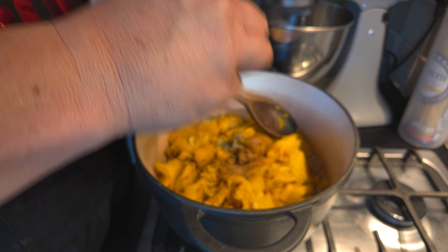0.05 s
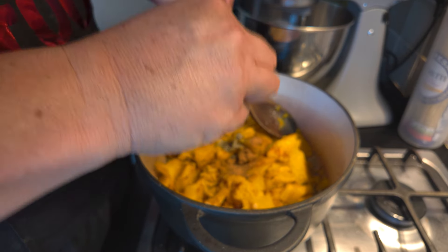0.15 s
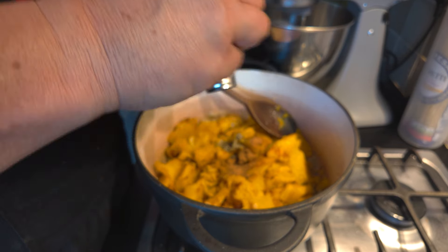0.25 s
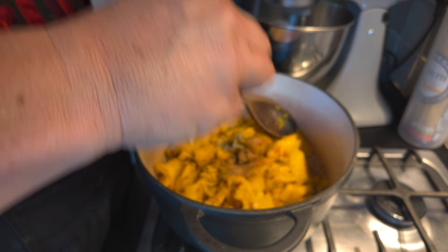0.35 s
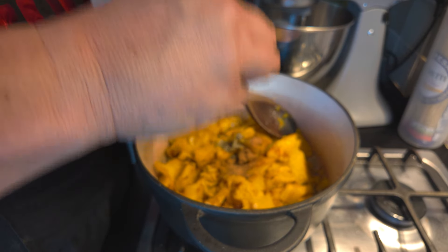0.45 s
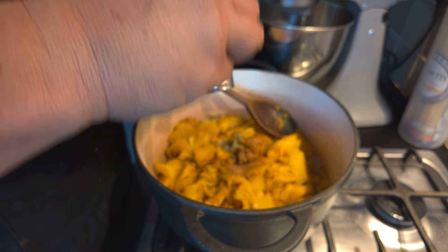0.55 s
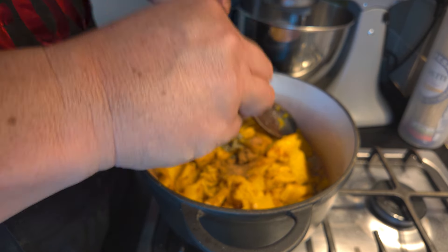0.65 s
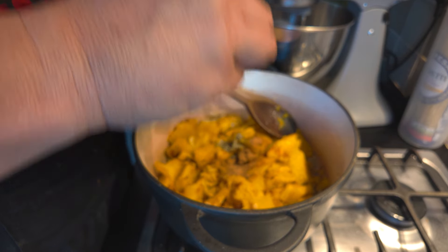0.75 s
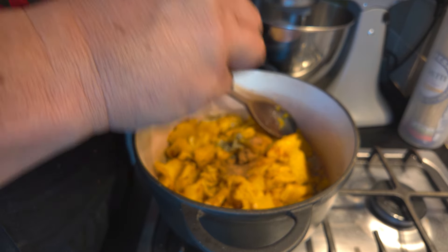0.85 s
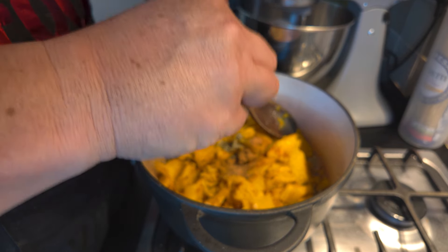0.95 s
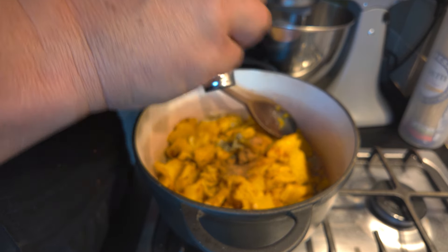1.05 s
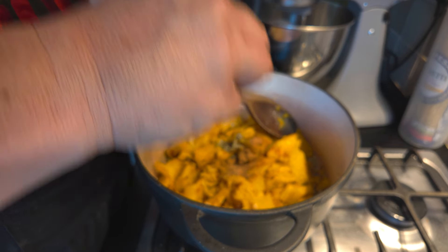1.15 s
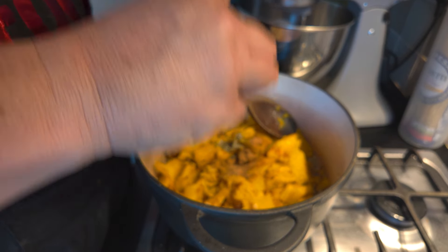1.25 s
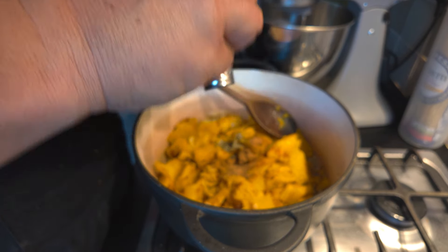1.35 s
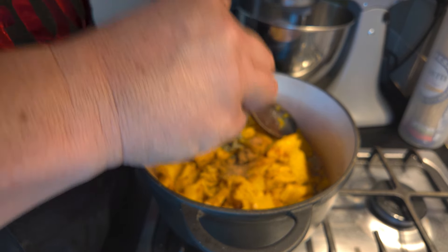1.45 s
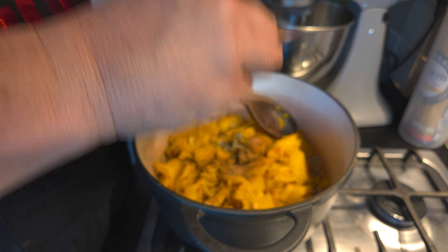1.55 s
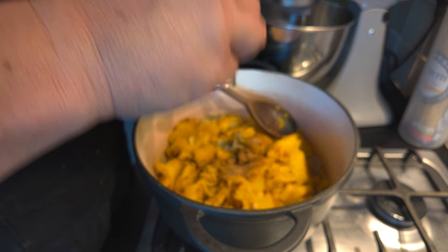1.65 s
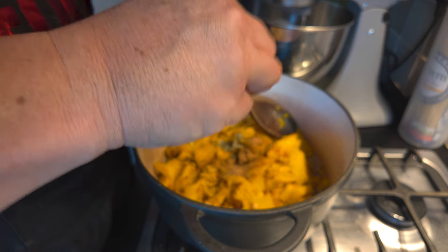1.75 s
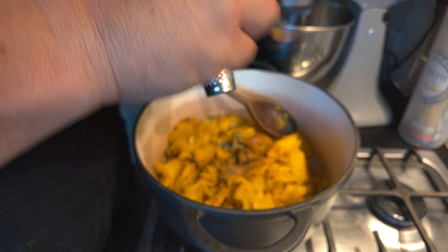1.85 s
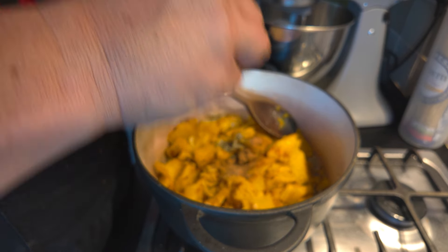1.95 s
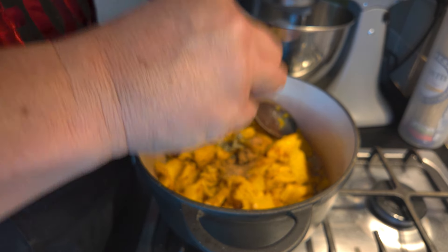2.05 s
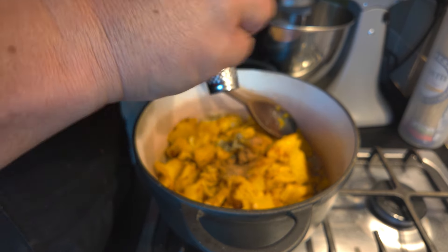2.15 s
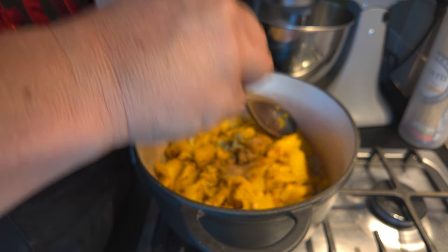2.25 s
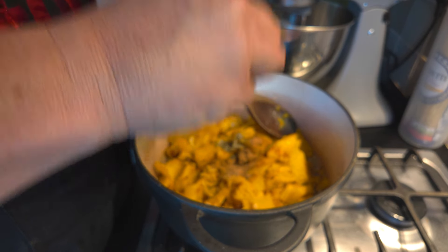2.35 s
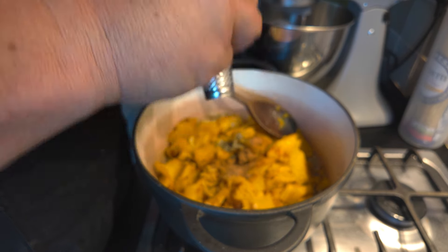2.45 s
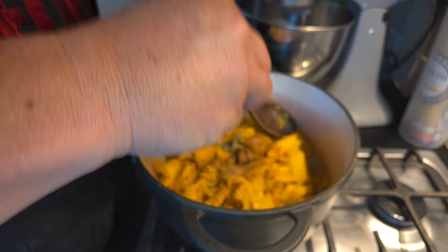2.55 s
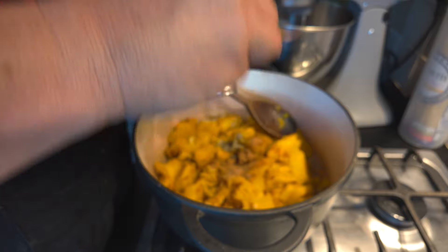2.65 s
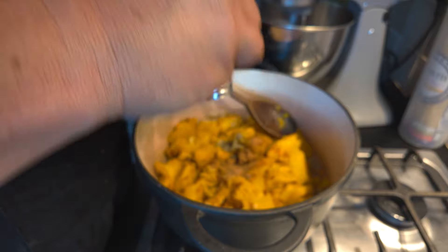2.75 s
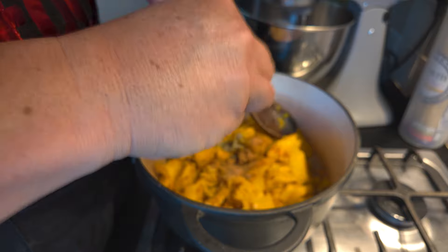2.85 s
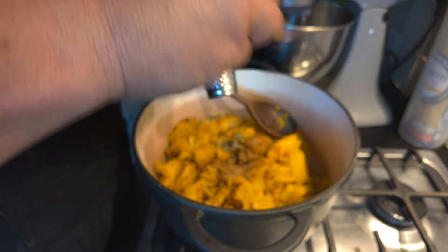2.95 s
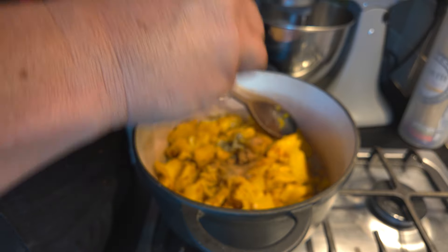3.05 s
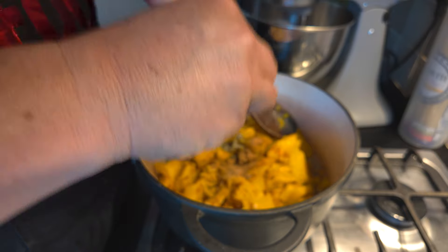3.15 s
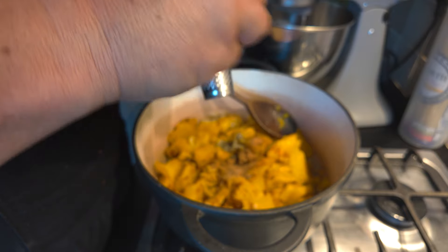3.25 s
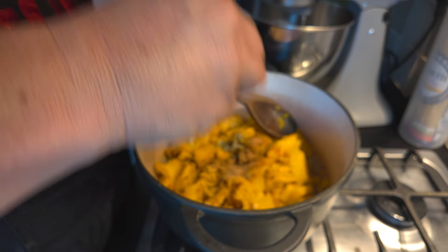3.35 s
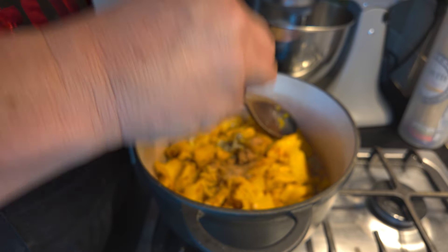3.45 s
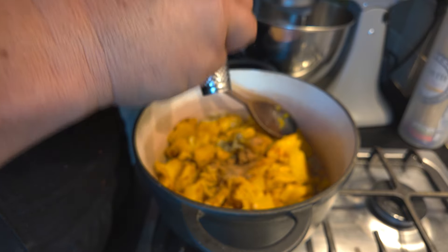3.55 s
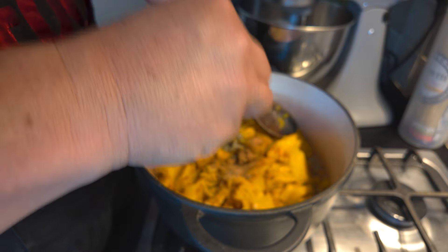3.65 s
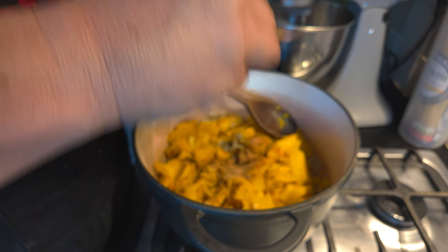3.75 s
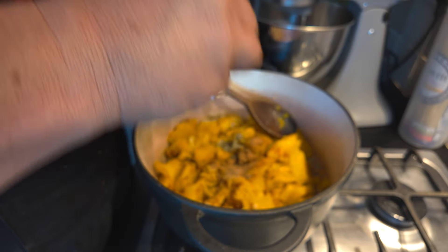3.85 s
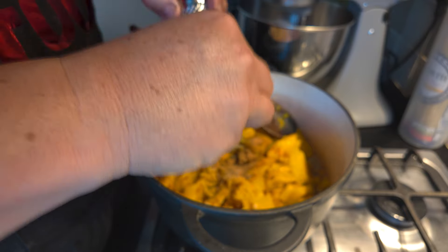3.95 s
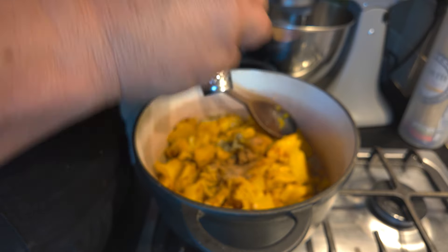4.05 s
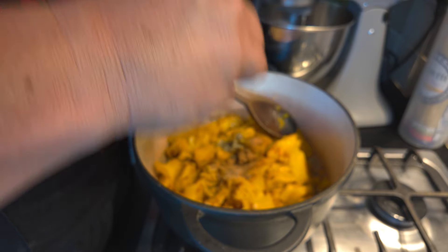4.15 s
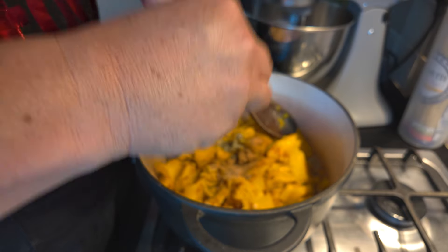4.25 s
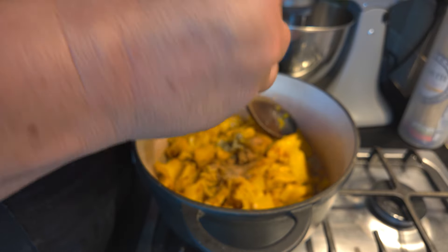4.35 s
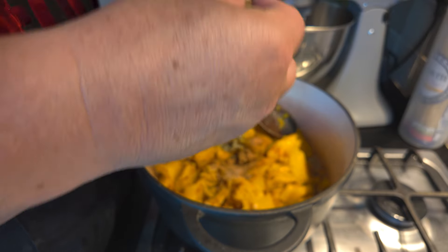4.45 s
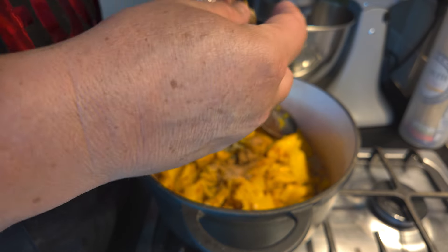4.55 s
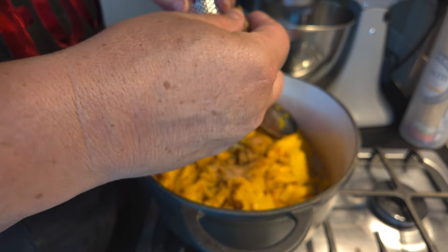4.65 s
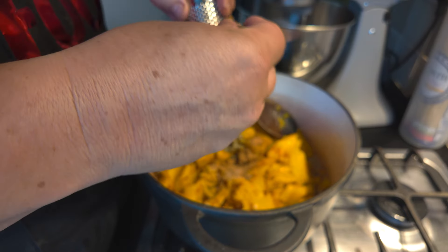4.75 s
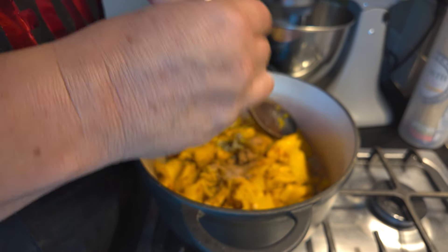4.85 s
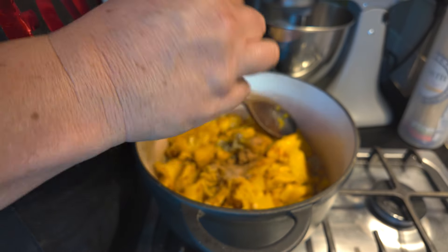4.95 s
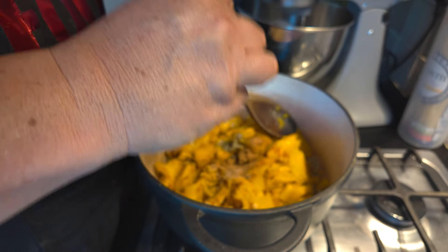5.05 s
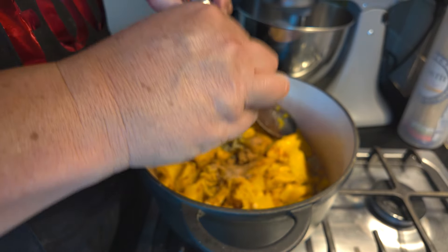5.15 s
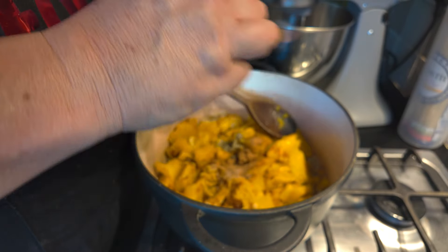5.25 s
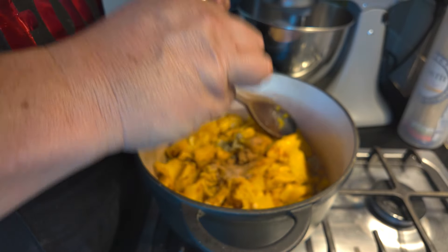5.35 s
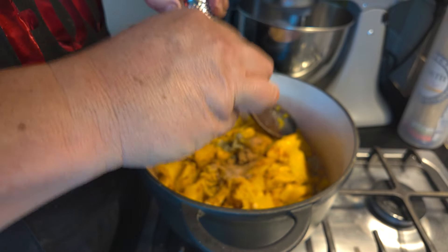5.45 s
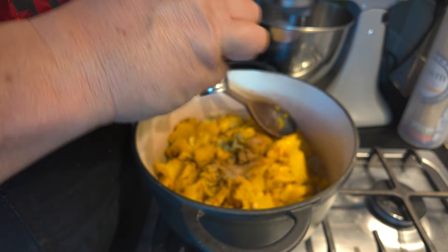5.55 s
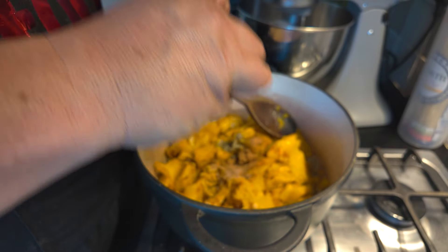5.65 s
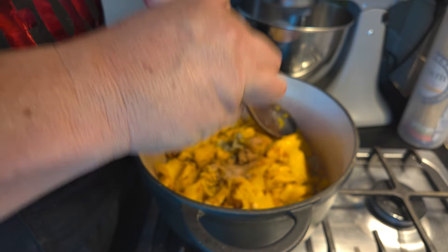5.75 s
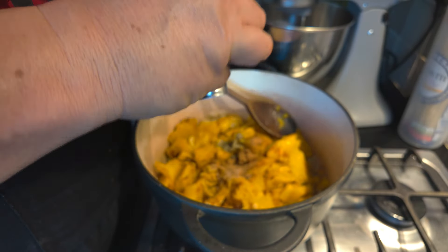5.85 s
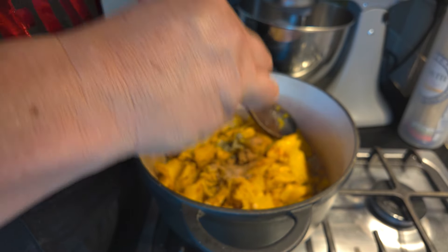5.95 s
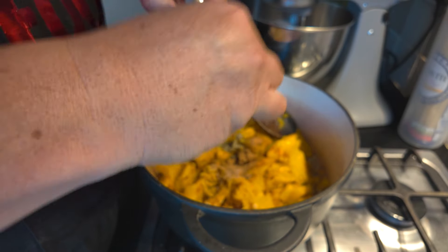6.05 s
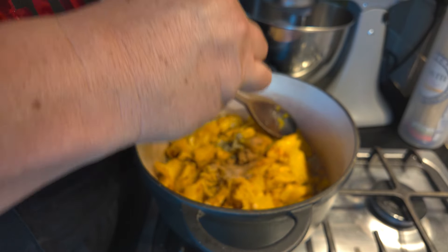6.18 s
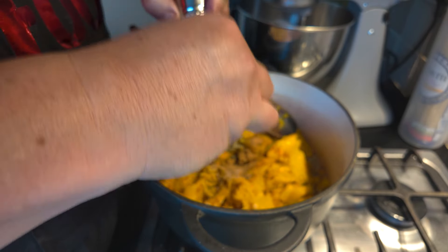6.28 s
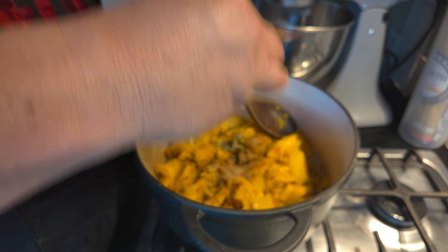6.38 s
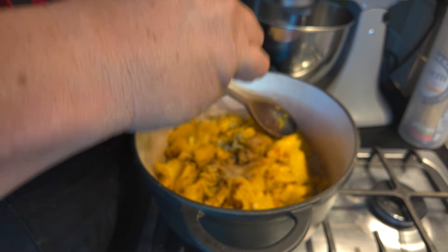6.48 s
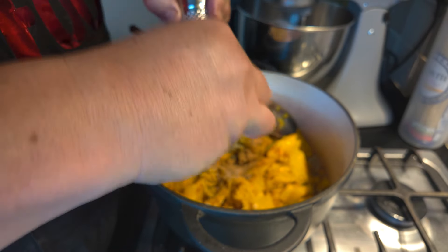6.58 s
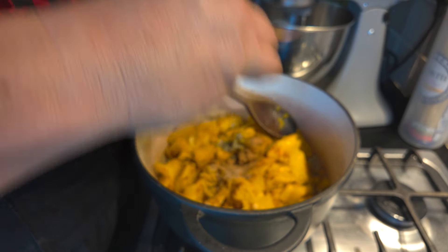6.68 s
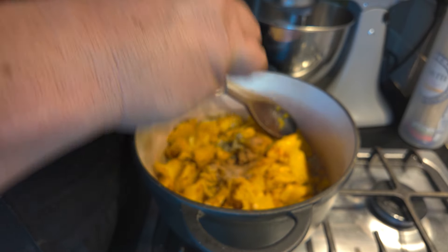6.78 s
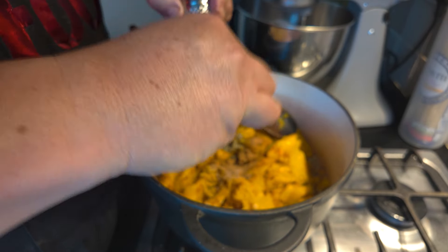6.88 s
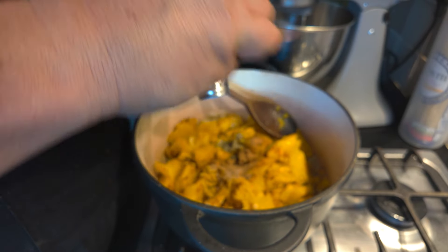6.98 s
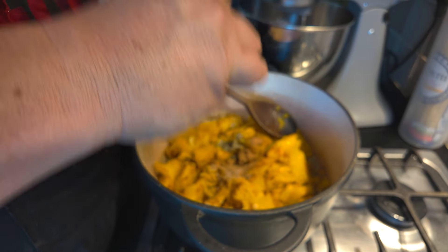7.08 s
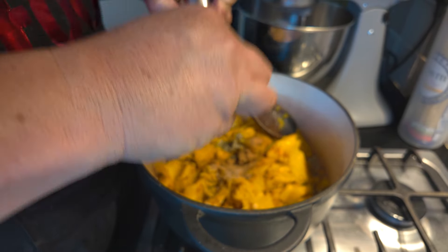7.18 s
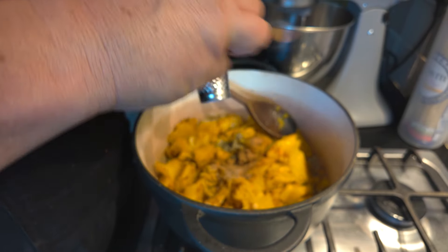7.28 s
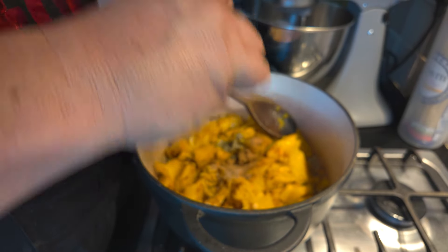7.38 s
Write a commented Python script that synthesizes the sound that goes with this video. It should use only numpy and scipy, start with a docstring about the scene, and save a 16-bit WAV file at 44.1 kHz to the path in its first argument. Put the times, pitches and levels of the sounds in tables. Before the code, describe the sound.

Fast, regular nutmeg grating, nearly four strokes a second: tap, faint skid back, crisp rasp across fine steel teeth. Thin plate rings colour every stroke, and a pot adds a faint lingering ring. A short gap past the middle holds dull handling, dry brushes and a small thump before grating returns with softer taps at first. Close microphone, short room response, faint rumbling kitchen air.

```python
"""A whole nutmeg is rasped on a small hand-held steel grater in a kitchen, close to one microphone.
A faint hum is there from the start. In each cycle the nut lands on the steel plate with a tap, skids
back lightly, then cuts forward across the teeth. Taps and bites ring the same plate; a pot below rings
along and the room answers. Midway there is a pause: the hand turns the nut over with a dull rub, a
fingertip brushes it and the grip shifts with a thump. Then the grating goes on."""
import sys
import numpy as np
from scipy import signal
from scipy.fft import rfft, irfft, next_fast_len
from scipy.io import wavfile
from scipy.ndimage import map_coordinates

SR = 44100
rng = np.random.default_rng(int(sys.argv[2]) if len(sys.argv) > 2 else 0)


def natural_amplitude(level_db):
    """Convert a level in decibels to a linear amplitude factor, elementwise."""
    exponent = np.asarray(level_db, float) / 20
    return 10 ** exponent


def generate_wav(sig):
    """Save sig (samples, or channels by samples) to the path in sys.argv[1] as 16-bit PCM at SR."""
    pcm = np.round(np.clip(np.atleast_2d(sig).T, -1, 1) * 32767).astype(np.int16)
    wavfile.write(sys.argv[1], SR, pcm)


N = 327222
TIME = np.arange(N) / SR  # seconds

# Tone colour of the kitchen air. Each row: frequency in Hz, relative level per Hz in dB.
AIR_COLOUR = [(15, -32), (25, -20), (45, -21.5), (59, -8), (242, -14.5), (439, -36), (560, 4), (695, -50),
              (1020, -6.5), (2110, -11.5), (2550, -8), (5730, -17), (16000, -39)]
AIR_DB = -56.5  # rms level
# Low rumble that comes and goes. Each row: time in seconds, rms level in dB.
RUMBLE_LEVEL = [(0.0, -64), (0.29, -56.5), (0.99, -61), (1.4, -55), (2.0, -67), (2.25, -57), (3.72, -58),
                (4.4, -61.5), (5.76, -65), (6.2, -57), (7.42, -63)]
# Tone colour of the rumble. Each row: frequency in Hz, relative level per Hz in dB.
RUMBLE_COLOUR = [(20, -28), (40, -10), (120, 2), (300, 0), (900, 1.5), (2000, -49)]

# Landings of the nut. Each row: time in seconds, relative strength of the tap in dB, relative pressure
# of the skid in dB, time for the skid to fall 60 dB in seconds, how freely the thin rings answer in dB.
LANDINGS = [(0.085, -1.5, -21, 0.035, 0), (0.352, -10.5, -31, 0.059, 0), (0.607, -11, -21, 0.021, -3),
            (0.893, -4, -25.5, 0.03, -7), (1.158, -3.5, -26, 0.033, -3), (1.425, -7.5, -35, 0.042, -8),
            (1.714, -4, -42.5, 0.51, -10), (1.977, -1, -37.5, 0.25, 0.5), (2.257, -9, -24.5, 0.05, 7.5),
            (2.525, -3.5, -36, 0.15, 3.5), (2.798, 4.5, -24.5, 0.056, 5), (3.084, 3, -19.5, 0.069, 4.5),
            (3.367, -0.5, -29.5, 0.074, 7), (3.626, -35, -28.5, 0.12, 7), (3.9, -2.5, -27, 0.11, -6),
            (4.17, -11, -32, 0.14, 9), (5.037, -40, -26.5, 0.018, -5), (5.357, -10, -43, 0.28, 3.5),
            (5.652, -12, -37.5, 0.22, 8), (5.939, -11, -48, 0.54, 10), (6.245, -14, -39, 0.27, 9),
            (6.531, -8.5, -37, 0.17, 3), (6.825, -2, -31, 0.15, 2), (7.111, -0.5, -37, 0.25, -3),
            (7.399, -2.5, -31.5, 0.12, 6)]
# Single hard catches of a tooth. Each row: time in seconds, relative strength in dB.
TOOTH_CATCHES = [(0.396, -3), (0.669, -17), (4.224, 2.5), (5.071, -30), (5.084, -16.5), (5.113, -10.5),
                 (5.386, -23), (5.411, -11), (5.717, -17), (5.982, -12), (6.092, -15), (6.57, -11),
                 (6.598, -9.5), (6.613, -15), (6.833, -9.5), (6.871, -7)]
# Dead knock of the nut itself. Each row: frequency in Hz, width in Hz, level in dB.
NUT_MODES = [(1570, 1650, -10)]
# Ways the plate can ring, in groups; the hand damps the broad ones. The first group ignores the grip,
# then come the upper body and the four thin rings from low to high.
# Each row: frequency in Hz, width in Hz, level under tooth bites in dB, level under a blow in dB.
PLATE_GROUPS = [
    [(330, 200, -24, -16), (720, 80, -12, -14), (867, 36, -4, 0), (1010, 55, -2, -10), (1500, 260, -8, 1),
     (2030, 150, -3, -8), (2250, 100, -5, -8), (2470, 100, -2, -8), (3550, 350, -16, -19),
     (4500, 400, -16, -20), (5150, 400, -11, -15), (5700, 450, -15, -18), (6750, 500, -16, -18),
     (7800, 1200, -23, -27), (10600, 1800, -27, -31), (13000, 1800, -34, -38)],
    [(2660, 150, -3, -2)],
    [(3114, 22, -10, 4)],
    [(4084, 18, -3, 0)],
    [(7020, 48, -7, -4)],
    [(11530, 36, -16, -13), (14650, 60, -33, -28)],
]
# The grip drifts and frees groups of modes. Each row: time in seconds, freedom of the upper body in dB,
# then of the four thin rings from low to high, each in dB.
GRIP_DRIFT = [(0, 4.5, -1, -6, -3, -3), (1.2, 2.5, 5.5, -1.5, -3, 2), (2, 2.5, 3, 1.5, -4.5, 2.5),
              (3, 3, 4.5, -2, -0.5, -1), (4.3, -2.5, 6, 3, 2.5, 5), (5.1, 0.5, 3, 5, 0, 8),
              (6.2, 3, 6.5, 2.5, 1, 3.5), (7.4, -0.5, 2, 4, 1.5, -3)]
TAP_BODY_DB = -9.5  # the upper body answers less where the nut lands
SPOT_DB, RING_SPOT_DB = 1.5, 2.5  # every contact spot favours other modes, the thin rings most

# The pot under the grater outlasts each stroke. Each row: frequency in Hz, width in Hz, level in dB.
POT_MODES = [(927, 4.7, -12.5), (2305, 4.7, 6), (2237, 41, -10), (2620, 8.3, -27)]
# How long the room rings. Each row: frequency in Hz, time to fall 60 dB in seconds.
ROOM_DECAY = [(150, 0.31), (600, 0.32), (2500, 0.36), (8000, .32), (15000, 0.27)]

SKID_HISS_DB, SKID_HISS_FOLLOWS = -42, 0.6  # the sharp part follows the skid's pressure only in part
SKID_UNEVEN_DB = 4  # the light skid stutters more than a cut

# Forward cuts. Each row: start in seconds, length in seconds, relative peak pressure in dB,
# time from start to peak in seconds, sharpness of the bites in dB against that pressure.
FORWARD_CUTS = [(0.131, 0.073, -31, .025, -2.5), (0.397, 0.075, -27.5, 0.034, -6),
                (0.667, 0.068, -31, 0.025, -5), (0.939, 0.086, -31, 0.037, -4),
                (1.2, 0.094, -31, 0.044, -6.5), (1.47, 0.17, -30, 0.059, -6.5),
                (1.767, 0.081, -33.5, 0.016, -9.5), (2.017, 0.11, -31.5, 0.056, -9),
                (2.3, 0.076, -29, 0.04, -4.5), (2.565, .108, -33, .05, -5), (2.843, 0.083, -32, 0.056, -1),
                (3.137, 0.066, -28.5, 0.025, -3), (3.4, 0.087, -26.5, 0.029, -6),
                (3.673, 0.077, -28, 0.044, -4), (3.941, 0.094, -30, .045, -2.5),
                (4.227, 0.074, -26.5, 0.02, 0), (5.118, 0.11, -29, 0.055, -11.5),
                (5.415, 0.11, -27.5, 0.042, -9), (5.719, 0.071, -29.5, 0.026, -7),
                (5.975, 0.21, -39, 0.076, -7.5), (6.311, 0.086, -30, 0.019, -6),
                (6.597, 0.088, -27, 0.022, -10), (6.872, 0.075, -26, 0.048, -8),
                (7.175, 0.074, -28.5, 0.021, -4.5)]
BITE_IN_S, LIFT_OFF_S = 0.0092, 0.021  # the teeth take hold; the nut leaves the plate
SWELL_S, EASE_S = 0.048, 0.043  # the swell is 6 dB under its peak this long before and after it
# Bites are sharpest at this share of the way to the peak.
EARLY, DULL_DB_PER_S, SHARPEN_DB_PER_S = 0.39, 128, 209
UNEVEN_DB, UNEVEN_PER_S = 1, 70  # the nut's rough face makes the pressure waver
GLINT_DB, GLINT_PER_S = 2, 110  # the brightness of the bites changes from tooth to tooth
# How hard the cuts shudder through the hand. Each row: time in seconds, level in dB against the pressure.
HAND_SHUDDER = [(0, -7.5), (1.8, -5.5), (2.1, -12), (2.9, -6), (3.3, -11.5), (4.3, -8), (5.1, -35),
                (5.8, -23), (6.3, -11), (6.6, -19), (6.9, -16.5), (7.3, -11)]
SHAKE_FADES_DB_PER_S = 185  # the shudder is strongest as the teeth take hold
# Tone colour of the shudder. Each row: frequency in Hz, relative level per Hz in dB.
SHUDDER_COLOUR = [(50, -60), (90, -12), (155, -4.5), (317, -0.5), (428, -11.5), (650, 1), (840, -13),
                  (1430, -120)]

# The hand turns the nut over, a dull rub. Each row: time in seconds, rms level in dB.
TURN_RUB = [(4.33, -71), (4.42, -58), (4.55, -57.5), (4.66, -84)]
# Dry brushes of a fingertip on the nut. Each row: time in seconds, relative level in dB.
BRUSHES = [(4.4894, -69), (4.5544, -57), (4.7294, -53), (4.805, -60), (4.894, -51)]
# A finger shifts its grip. Each row: time in seconds, relative level in dB.
GRIP_THUMP = [(4.977, -33)]
TOP_HZ = 15760  # little is left above this


def unit(x):
    """Scale to rms 1."""
    return x / np.sqrt(np.mean(x ** 2) + 1e-20)


def along(points, hz):
    """Read (Hz, value) points on a log axis."""
    f, v = np.transpose(points)
    return np.interp(np.log(hz + 1), np.log(f + 1), v)


def filtered(x, response):
    """Shape x by a complex response of frequency."""
    m = next_fast_len(N + SR // 2)
    return irfft(rfft(x, m) * response(np.fft.rfftfreq(m, 1 / SR)), m)[..., :N]


def resonances(modes):
    """Ringing of (Hz, width, dB) modes; neighbours swing in opposite phase."""
    def response(f):
        total = 0
        for k, (hz, width, db) in enumerate(modes):
            total = total + (-1) ** k * natural_amplitude(db) * 1j * f * width / (hz * hz - f * f + 1j * f * width)
        return total
    return response


def edge(hz):
    """High-pass of second order."""
    return lambda f: (1j * f / (hz + 1j * f)) ** 2


def noise(spectrum):
    """Coloured noise of rms 1."""
    return unit(filtered(rng.standard_normal(N), lambda hz: natural_amplitude(along(spectrum, hz))))


def waver(rate):
    """A smooth random curve, rate knots a second."""
    return map_coordinates(rng.standard_normal(int(N * rate / SR) + 4), [TIME * rate])


def hum():
    """Steady noise of the kitchen air over a low rumble that comes and goes."""
    rumble_gain = natural_amplitude(np.interp(TIME, *np.transpose(RUMBLE_LEVEL)))
    return natural_amplitude(AIR_DB) * noise(AIR_COLOUR) + rumble_gain * noise(RUMBLE_COLOUR)


def blows():
    """Taps and catches are single pushes, rounded because the nut is softer than steel."""
    pushes = np.zeros(N)
    for s, db, *_ in list(LANDINGS) + list(TOOTH_CATCHES):
        pushes[round(s * SR)] = -natural_amplitude(db + 13.5)
    return filtered(pushes, lambda f: 1 / (1 + 1j * f / 5000) ** 3)


def nut_knock(pushes):
    """The nut itself knocks: a very broad mode that dies at once."""
    return filtered(pushes, resonances(NUT_MODES))


def freedom():
    """Start of every contact, and how freely each group of plate modes answers during it."""
    when, *drift_db = np.transpose(GRIP_DRIFT)

    def grip(s):
        return np.array([0] + [np.interp(s, when, db) for db in drift_db])

    rows = [(s - BITE_IN_S / 2, *grip(s)) for s, *_ in FORWARD_CUTS]
    for s, *_, ring_db in LANDINGS:
        rings = grip(s)[2:]
        # a landing sets the mean of its rings; the grip sets only their balance
        rows.append((s - .003, 0, TAP_BODY_DB, *(ring_db + rings - rings.mean())))
    return np.transpose(sorted(rows))


def plate(teeth, pushes):
    """Bites and blows drive the same plate modes, as freely as each contact lets them ring."""
    starts, *free_db = freedom()
    contact = np.clip(np.searchsorted(starts, TIME) - 1, 0, None)
    ladder = sorted(mode[0] for group in PLATE_GROUPS for mode in group)
    out = np.zeros(N)
    for group, db in zip(PLATE_GROUPS, free_db):
        for hz, width, bite_db, blow_db in group:
            spread_db = SPOT_DB if width > 50 or hz < 2000 else RING_SPOT_DB
            spot_db = spread_db * rng.standard_normal(len(starts))
            drive = natural_amplitude(db + spot_db)[contact] * (natural_amplitude(bite_db) * teeth + natural_amplitude(blow_db) * pushes)
            sign = (-1) ** np.searchsorted(ladder, hz)  # neighbours swing in opposite phase
            out += sign * filtered(drive, resonances([(hz, width, 0)]))
    return out


def pot(near):
    """The pot rings along through narrow, slowly dying modes."""
    return filtered(near, resonances(POT_MODES))


def kitchen(x):
    """Each frequency of the room's answer dies at its own speed; a new tail for every stretch of time."""
    out, step = np.zeros(N + 2 * SR), SR // 4
    for a in range(0, N, step):
        hz, t, z = signal.stft(rng.standard_normal(SR // 2), SR, nperseg=256)
        fade = natural_amplitude(-60 * t / along(ROOM_DECAY, hz)[:, None])
        tail = signal.istft(z * fade, SR, nperseg=256)[1]
        wet = signal.fftconvolve(x[a:a + step], tail / np.linalg.norm(tail))
        out[a + 200:][:len(wet)] += wet  # the room answers 200 samples late
    return out[:N]


def skids():
    """Pressure and its sharp part as the nut skids lightly back: a short, stuttering, fading contact."""
    press, sharp = np.zeros((2, N))
    stutter = natural_amplitude(SKID_UNEVEN_DB * waver(UNEVEN_PER_S))
    for s, _, skid_db, t60, _ in LANDINGS:
        u = np.clip(TIME - s, 0, 1)
        grab = np.clip(u / .003, 0, 1) * (u < .07)  # the teeth take hold just after the tap
        ease = natural_amplitude(-60 * u / max(t60, .02))  # pressure eases as the nut bounces back
        bounce = grab * stutter ** np.clip(u / 0.011, 0, 1) * ease
        press += bounce * natural_amplitude(skid_db)
        sharp += bounce * natural_amplitude(SKID_HISS_DB + SKID_HISS_FOLLOWS * (skid_db - SKID_HISS_DB))
    return press, sharp


def cuts():
    """Pressure, its sharp part and the shudder of the forward cuts: each swells, then eases."""
    press, sharp, shake = np.zeros((3, N))
    for s, length, db, peak, sharp_db in FORWARD_CUTS:
        u = TIME - s
        touch = np.interp(u, [-BITE_IN_S / 2, BITE_IN_S / 2, length, length + LIFT_OFF_S], [0, 1, 1, 0]) ** 2
        arch_db = db - 6 * ((u - peak) / np.where(u < peak, SWELL_S, EASE_S)) ** 2
        late = u - EARLY * peak  # seconds after the sharpest moment
        dulling_db = np.where(late > 0, DULL_DB_PER_S, -SHARPEN_DB_PER_S) * late
        hand_db = np.interp(s, *np.transpose(HAND_SHUDDER))
        press += touch * natural_amplitude(arch_db)
        sharp += touch * natural_amplitude(db + sharp_db - dulling_db)
        shake += touch * natural_amplitude(arch_db + hand_db - SHAKE_FADES_DB_PER_S * late)
    return natural_amplitude(UNEVEN_DB * waver(UNEVEN_PER_S)) * np.array([press, sharp, shake])


def bites(rate, spread_db, smooth):
    """Sparse impulses of uneven size, rate a second, over a share of continuous scraping."""
    chance, size, scrape = rng.random(N), rng.standard_normal(N), rng.standard_normal(N)
    clicks = (chance < rate / SR) * natural_amplitude(spread_db * np.clip(size, -2, 2))
    return unit(unit(clicks) + smooth * scrape)


def tooth_bites(press, sharp):
    """Pressure drives dull, sparse bites; its sharp part drives bright, dense ones."""
    dull = press * bites(350, spread_db=1, smooth=0.66)
    bright = sharp * natural_amplitude(GLINT_DB * waver(GLINT_PER_S)) * bites(2000, spread_db=0.0, smooth=1.63)
    teeth = filtered(dull, lambda f: natural_amplitude(21) / (1 + 1j * f / 3500) ** 2)
    return teeth + filtered(bright, lambda f: natural_amplitude(25.0) * edge(3000)(f))


def shudder(shake):
    """The cuts shake the hand: low noise that follows the shudder's strength."""
    return shake * noise(SHUDDER_COLOUR)


def turning_rub():
    """The hand turns the nut over: dull noise that swells and fades."""
    rub = unit(filtered(rng.standard_normal(N), lambda f: edge(90)(f) / (1 + 1j * f / 700) ** 2))
    return natural_amplitude(np.interp(TIME, *np.transpose(TURN_RUB), left=-120, right=-120)) * rub


def fingertip_brushes():
    """Dry brushes on the nut: brief, soft-edged puffs of bright noise."""
    dry = unit(filtered(rng.standard_normal(N), lambda f: edge(3000)(f) / (1 + 1j * f / 6000) ** 2))
    out = np.zeros(N)
    for s, db in BRUSHES:
        out += natural_amplitude(db - 8) * np.exp(-((TIME - s - .004) / .005) ** 2) * dry
    return out


def grip_thump():
    """A finger shifts its grip: two low tones that fall 60 dB in 17 ms."""
    out = np.zeros(N)
    for s, db in GRIP_THUMP:
        u = np.clip(TIME - s, 0, 1)
        tones = np.sin(2 * np.pi * 170 * u) + 0.58 * np.sin(2 * np.pi * 330 * u)
        out -= natural_amplitude(db - 60 * u / 0.017) * tones
    return out


def scene():
    """Grater, fingers, pot, room and hum meet in one microphone, which feeds both channels."""
    air = hum()
    pushes = blows()
    skid_press, skid_sharp = skids()
    cut_press, cut_sharp, shake = cuts()
    teeth = tooth_bites(skid_press + cut_press, skid_sharp + cut_sharp)
    grater = nut_knock(pushes) + plate(teeth, pushes) + shudder(shake)
    near = grater + turning_rub() + fingertip_brushes() + grip_thump()
    near = near + pot(near)
    return np.tile(near + natural_amplitude(-11.0) * kitchen(near) + air, (2, 1))


def top_cut(x):
    """Nothing passes above the cut-off."""
    return signal.sosfilt(signal.butter(12, 16480, fs=SR, output="sos"), x)


def record(dry):
    """Everything above the top frequency is turned down by 36 dB."""
    mix = filtered(dry, lambda f: np.where(f < TOP_HZ, 1, natural_amplitude(-36)))
    return top_cut(mix)


dry = scene()
out = record(dry)
generate_wav(out)
```